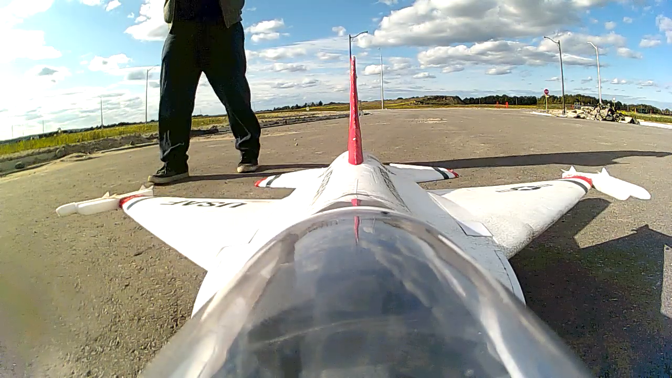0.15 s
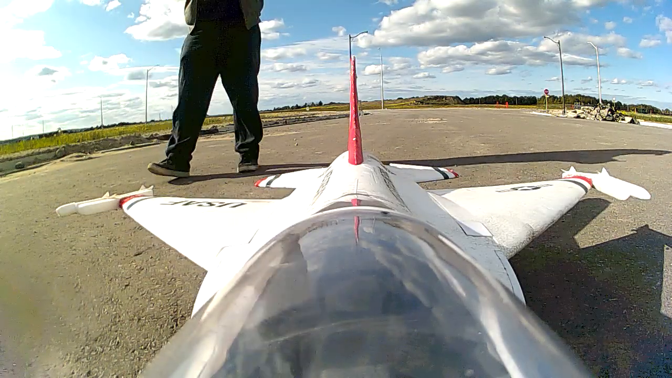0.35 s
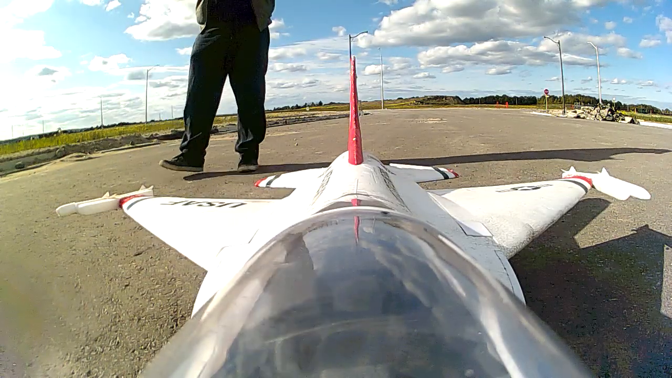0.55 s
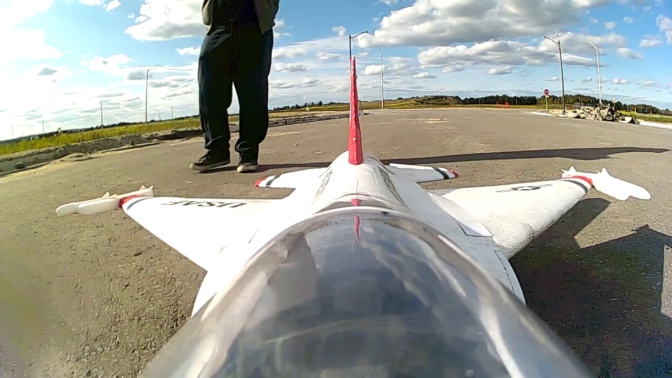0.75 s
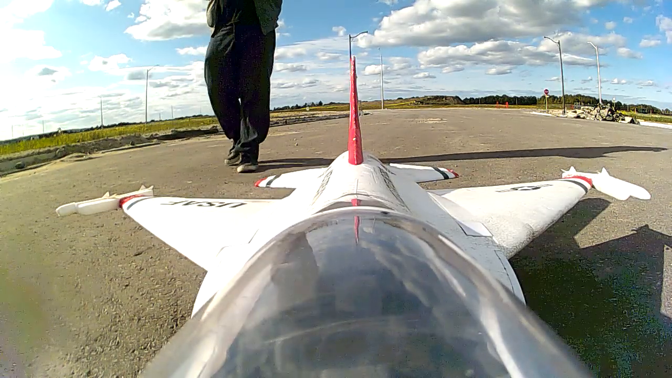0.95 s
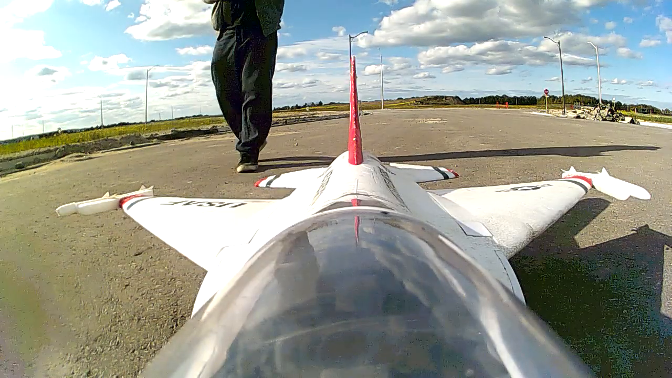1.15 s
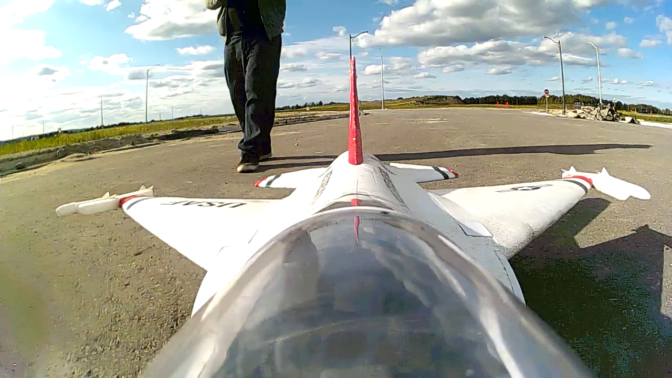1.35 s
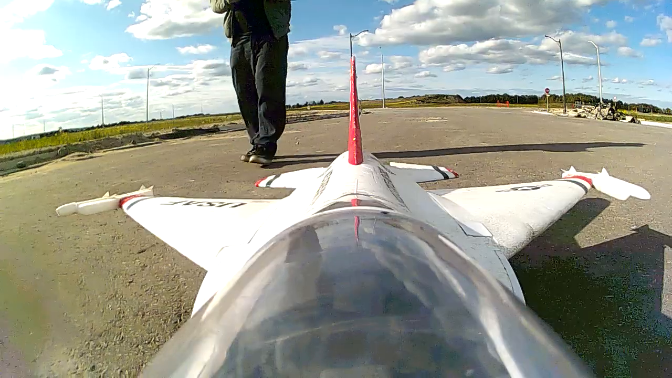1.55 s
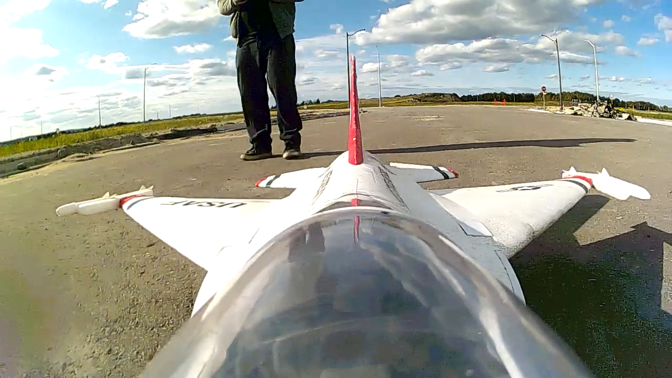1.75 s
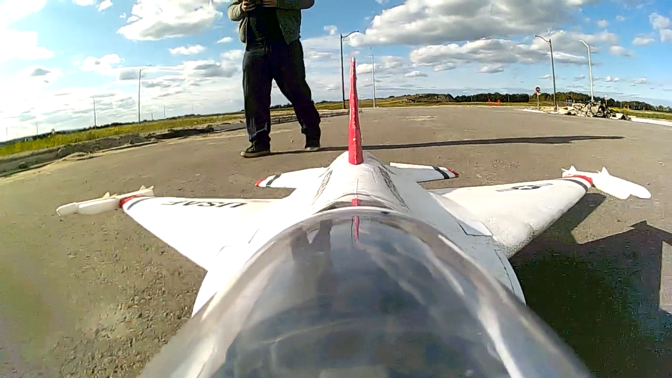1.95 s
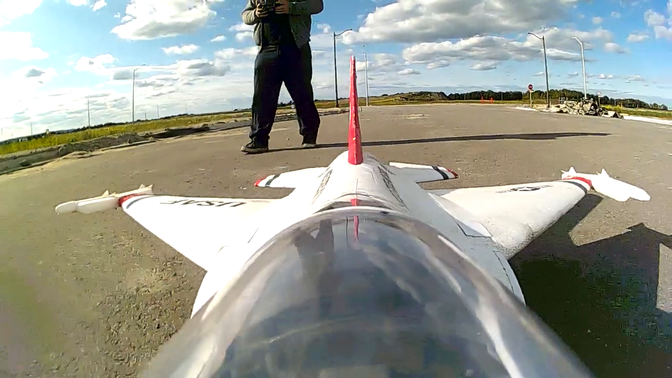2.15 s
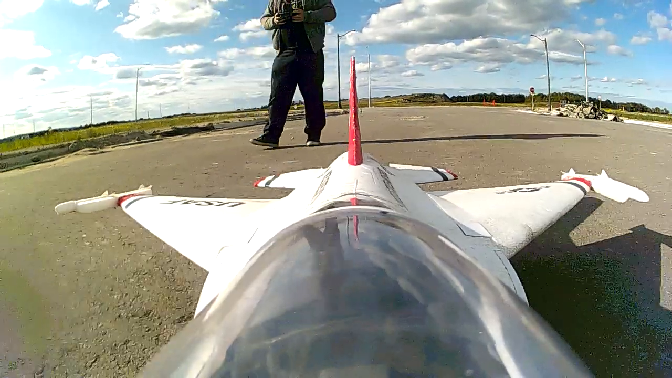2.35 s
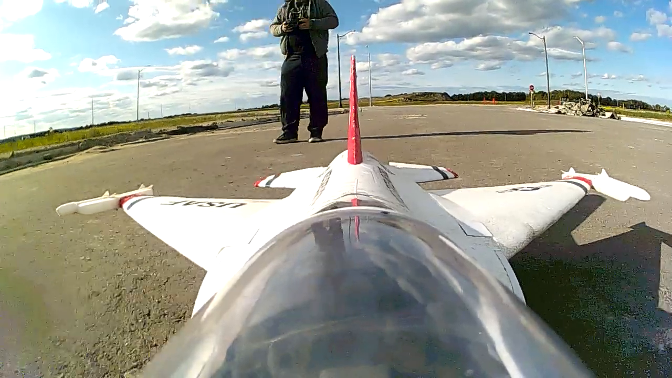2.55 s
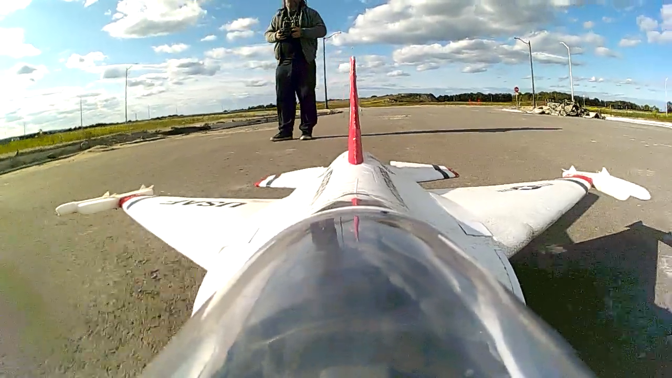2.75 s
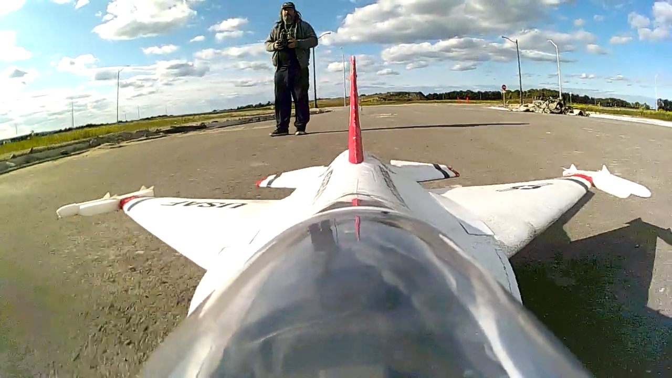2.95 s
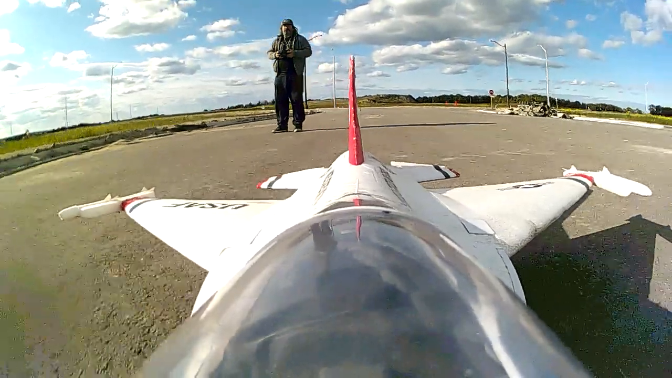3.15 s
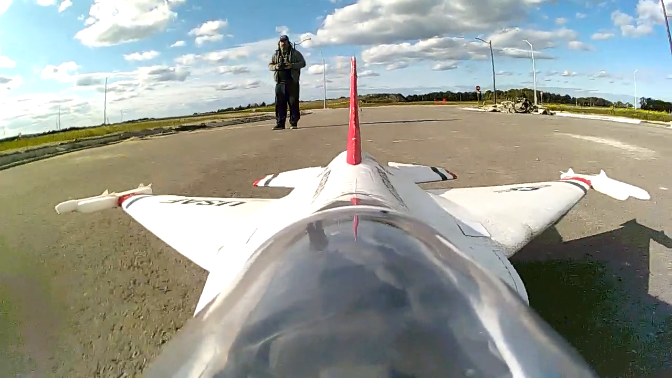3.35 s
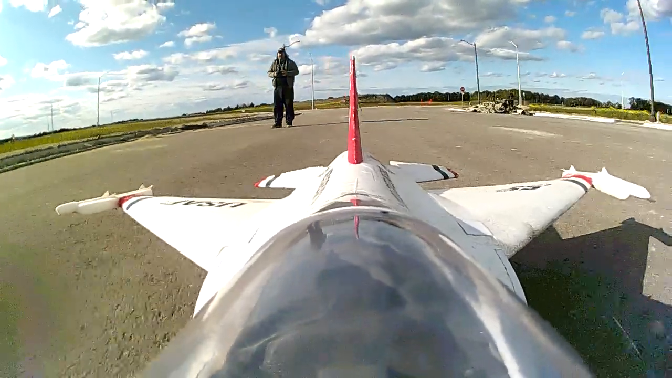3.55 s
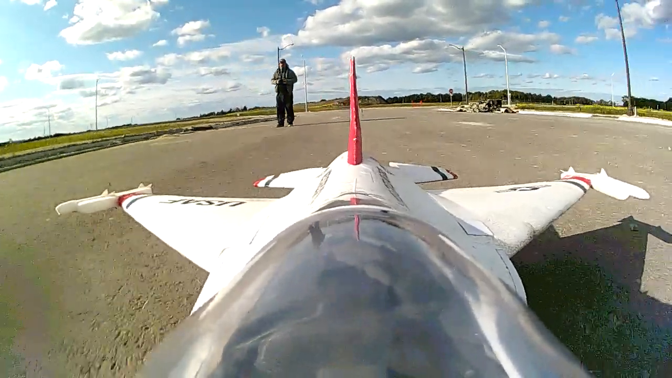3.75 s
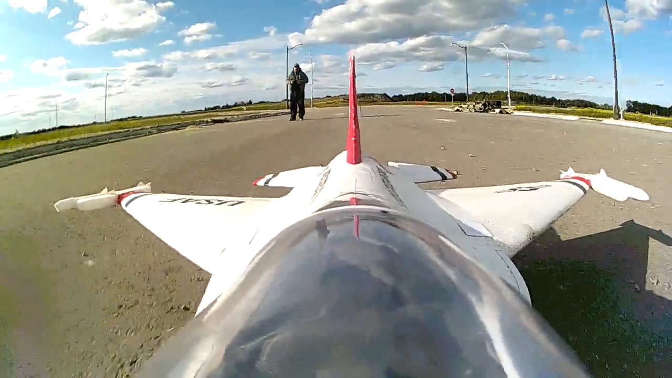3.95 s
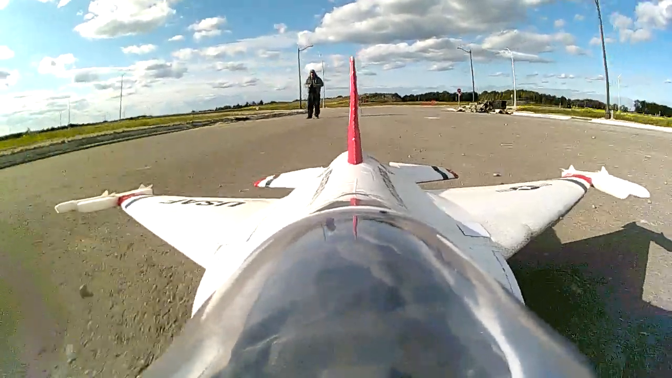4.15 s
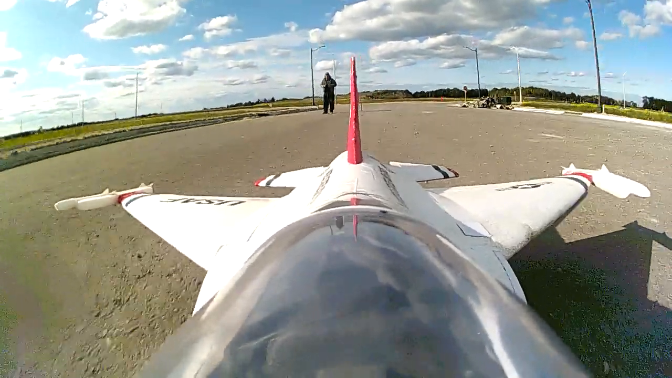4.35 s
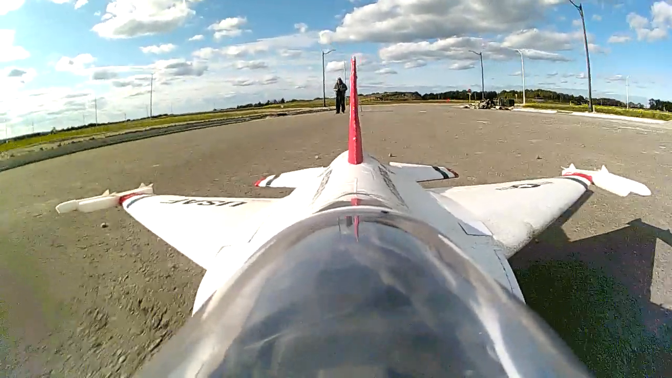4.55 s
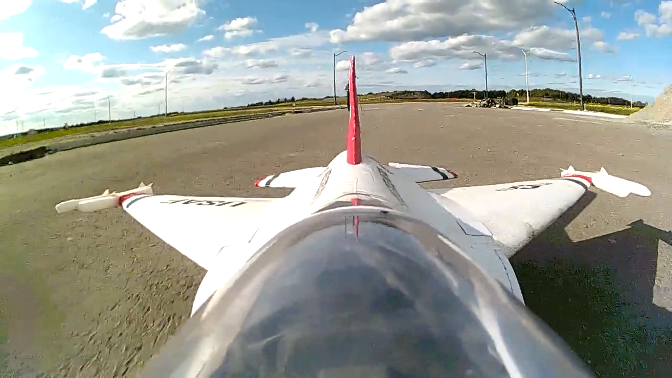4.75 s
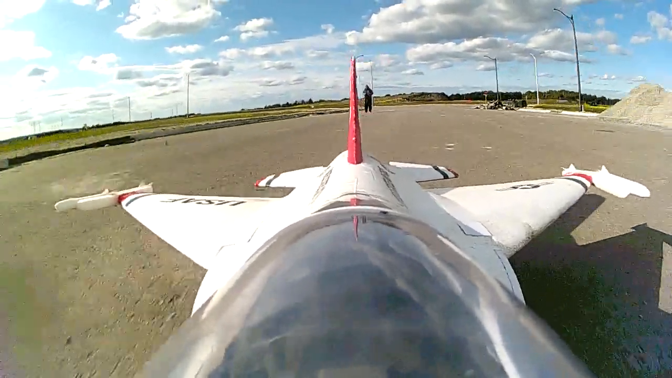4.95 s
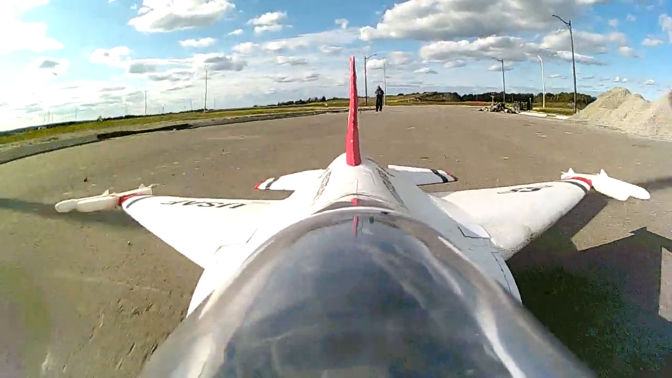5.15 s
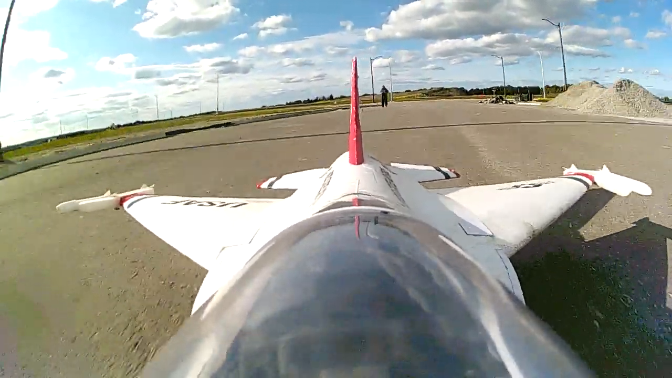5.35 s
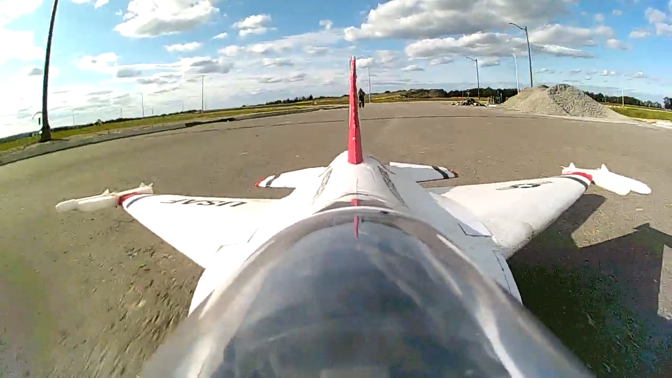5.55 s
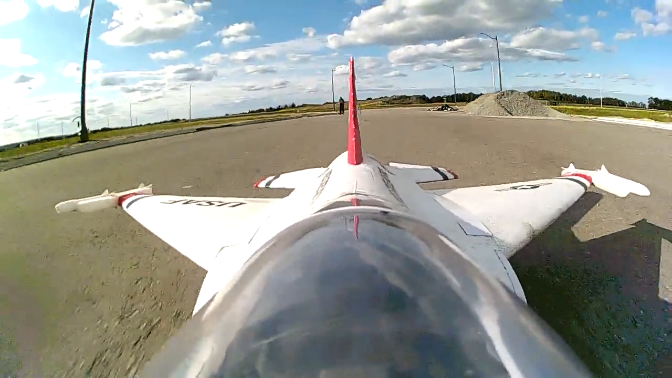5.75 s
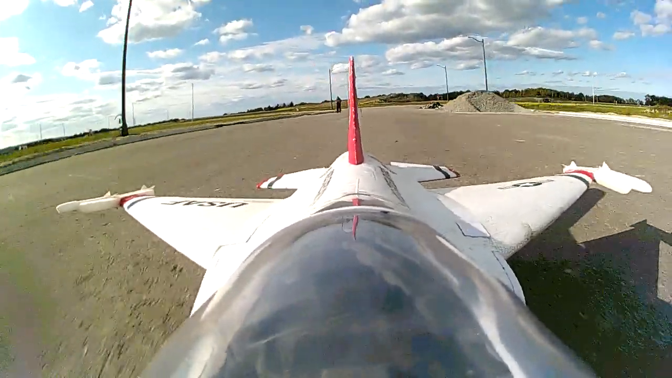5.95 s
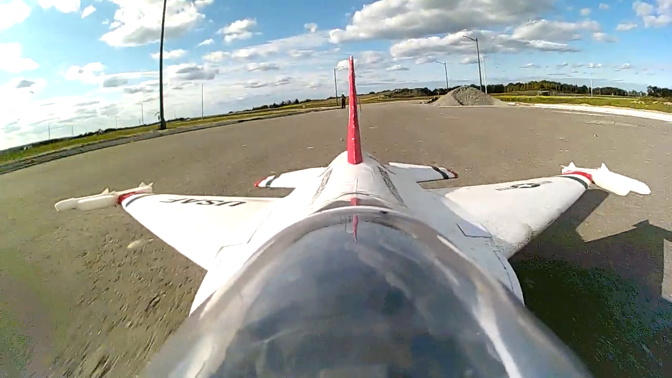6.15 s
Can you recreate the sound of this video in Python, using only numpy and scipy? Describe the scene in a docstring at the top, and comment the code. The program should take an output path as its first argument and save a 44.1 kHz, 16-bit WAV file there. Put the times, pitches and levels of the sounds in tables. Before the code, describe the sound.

A model jet's electric fan twitches, chirps and catches, then surges to a loud steady hum with roaring air, wheel rumble and growing wind.

```python
"""Quiet open air with scuffs, then twitches, rising chirps, a hum with roaring air, and wheels and wind.
A model jet with an electric ducted fan starts up, idles and accelerates along an asphalt runway.
The microphone rides on its nose, so motor, wheels and wind are close and the airframe carries them.
Shaft rate drives the hum and the noise of air in the duct; the thrust adds up to ground speed, which
drives wheel noise and wind. The narrow-band microphone overloads on the loudest peaks."""
import sys
import numpy as np
from scipy import signal
from scipy.fft import rfft, irfft
from scipy.io import wavfile
from scipy.ndimage import uniform_filter1d

SR = 44100
rng = np.random.default_rng(int(sys.argv[2]) if len(sys.argv) > 2 else 0)


def dump(signal):
    """Clip the signal to [-1, 1] and save it as 16-bit WAV at the path in sys.argv[1]."""
    limited = np.clip(np.atleast_2d(signal).T, -1, 1)
    pcm = np.round(limited * 32767).astype(np.int16)
    wavfile.write(sys.argv[1], SR, pcm)


N = 272979
T = np.arange(N) / SR  # seconds


def undb(db):
    """Decibels to gain."""
    return 10 ** (np.asarray(db) / 20)


def unit(x):
    """Scale to rms 1."""
    return x / np.sqrt(np.mean(x ** 2))


def ramp(start, length):
    """Rise from 0 to 1 over a stretch of time in seconds."""
    return np.clip((T - start) / length, 0, 1)


def gate(start, length, edge_s=0.02):
    """Attack, hold and release, with edges centred on the start and end."""
    return ramp(start - edge_s / 2, edge_s) - ramp(start + length - edge_s / 2, edge_s)


def bell(centre, spread):
    """Gaussian swell in time, 1 at its peak."""
    return np.exp(-0.5 * ((T - centre) / spread) ** 2)


def walk(rate_hz):
    """Smooth random drift with spread 1."""
    step = int(SR / rate_hz)
    held = np.repeat(rng.standard_normal(N // step + 1), step)
    smooth = uniform_filter1d(uniform_filter1d(held, step), step)
    return unit(smooth[:N])


def noise(spectrum):
    """Noise of rms 1, coloured by a table of frequency and level."""
    hz, db = np.transpose(spectrum)
    bins_hz = np.maximum(np.arange(N // 2 + 1) * SR / N, 1)
    colour_db = np.interp(np.log(bins_hz), np.log(hz), db)
    return unit(irfft(rfft(rng.standard_normal(N)) * undb(colour_db), N))


def resonate(x, hz, width):
    """One resonance, gain 1 at its centre."""
    return signal.lfilter(*signal.iirpeak(hz, hz / width, fs=SR), x)


def rub_noise(first, second):
    """Noise of rms 1 through two resonances in a row, each given as (Hz, width Hz)."""
    return unit(resonate(resonate(rng.standard_normal(N), *first), *second))


def boost(hz, resonances):
    """Decibels that a gliding tone gains as it crosses resonances."""
    return sum(db * np.exp(-((hz - centre) / width) ** 2) for centre, width, db in resonances)


# Open-air background around the runway: freq_hz, level_db (relative)
OPEN_AIR = [(25, 3), (60, 1.5), (110, 3.5), (150, -4), (230, -7.5), (400, -8), (600, -12.5), (800, -6),
            (1100, -7.5), (1600, -13), (2450, -19.5), (3450, -22.5), (4000, -29.5)]
# Soft scuffs and thuds before the start: peak_s, level_db, centre_hz, width_hz, spread_s
SHOE_SCUFFS = [(.02, -66, 1290, 900, 0.084), (0.013, -70, 2330, 400, 0.036), (0.043, -60, 670, 200, 0.013),
               (0.105, -62, 2180, 250, 0.012), (0.12, -52.5, 1940, 800, 0.0029),
               (0.161, -59, 350, 250, 0.0036), (0.997, -53, 90, 50, 0.011)]


def airfield(air_db=-65.5, drift_db=0.91):
    """Quiet open air as coloured noise, with a few shoe scuffs and soft thuds as swells of band noise."""
    out = noise(OPEN_AIR) * undb(air_db + drift_db * walk(4.2))
    for peak_s, db, hz, width, spread in SHOE_SCUFFS:
        rub = rub_noise((hz, width), (hz, width))
        out = out + undb(db) * rub * bell(peak_s, spread)
    return out


# Resonances of the motor mount: centre_hz, width_hz, level_db
MOUNT_MODES = [(1820, 78, 0), (2470, 61, -1.5)]


def mount(x):
    """Vibration ringing through the modes of the motor mount."""
    return sum(undb(db) * resonate(x, hz, width) for hz, width, db in MOUNT_MODES)


# Jerks of the rotor before it runs smoothly: peak_s, level_db, spread_s
ROTOR_JERKS = [(1.056, -61, 0.0046), (1.074, -57, 0.003), (1.1, -41.5, 0.011), (1.163, -58, 0.013),
               (1.23, -57, 0.012), (1.358, -49.5, 0.021), (1.372, -36, 0.0037), (1.394, -29.5, 0.0044)]


def jerks(overtone_db=-14, rub_db=-17, wobble=0.0131):
    """Each jerk of the rotor sets the mount modes ringing softly, with a little rubbing noise."""
    swell = sum(undb(db) * bell(peak_s, spread) for peak_s, db, spread in ROTOR_JERKS)
    ring = 0
    for i, (hz, _, db) in enumerate(MOUNT_MODES):
        wavering_hz = hz * (1 + wobble * walk(200))
        angle = 2 * np.pi * np.cumsum(wavering_hz) / SR
        ring = ring + undb(db + i * overtone_db) * np.sin(angle)
    rub = rub_noise((1300, 1100), (1000, 1100))
    return swell * (np.sqrt(2) * ring + undb(rub_db) * rub)


# Resonance that the chirps excite: centre_hz, width_hz, boost_db
CHIRP_RESONANCE = [(418, 45, 5.5)]
# The motor pulling into step: start_s, length_s, first_hz, last_hz, level_db, pitch scatter (share)
STEP_CHIRPS = [(1.058, 0.08, 398, 433, -54.5, 0.065), (1.163, 0.192, 303, 590, -48.5, 0.022)]


def chirp(rasp_db=-32, stutter_db=5.0):
    """The drive current sings unevenly in rising glides as it drags the rotor up; the mount buzzes along."""
    out = 0
    buzz = unit(mount(rng.standard_normal(N)))
    for start, length, first_hz, last_hz, db, scatter in STEP_CHIRPS:
        glide_hz = first_hz + (last_hz - first_hz) * np.sin(np.pi / 2 * ramp(start, length))
        uneven_hz = glide_hz * (1 + scatter * walk(168.5))
        tone = np.sqrt(2) * np.sin(2 * np.pi * np.cumsum(uneven_hz) / SR)
        level_db = db + boost(glide_hz, CHIRP_RESONANCE) + stutter_db * walk(100)
        out = out + gate(start, length) * undb(level_db) * (tone + undb(rasp_db) * buzz)
    return out


# The rotor catches, then settles towards its lowest running shaft rate
START_S, START_LAG_S, START_HZ = 1.369, 0.041, 289.1
SAG_HZ, SAG_S = 25.83, 2.4  # loss of shaft rate as the battery tires, and its time constant
# Throttle pushes, to taxi, a nudge, then full power: start_s, length_s, shaft_rise_hz
THROTTLE_PUSHES = [(1.586, 0.13, 73), (2.54, 0.1, 18), (2.653, .215, 229.5)]


def shaft_rate():
    """The rotor catches, follows each throttle push, then slows a little as the battery sags (Hz)."""
    caught = START_HZ * (1 - np.exp(-np.maximum(T - START_S, 0) / START_LAG_S))
    pushes = sum(rise * ramp(start, length) for start, length, rise in THROTTLE_PUSHES)
    last_start, last_length, _ = THROTTLE_PUSHES[-1]
    full_power_s = np.maximum(T - last_start - last_length, 0)
    sag = SAG_HZ * (1 - np.exp(-full_power_s / SAG_S))
    return np.maximum(caught + uniform_filter1d(pushes, size=1500) - sag, 1)


# Air through the duct, with its pipe resonances: freq_hz, level_db (relative)
DUCT_COLOUR = [(40, -15), (210, -6.5), (490, 1.5), (760, -3), (890, -12.5), (1000, -15.5), (1090, 2.5),
               (1300, 1), (1620, -5.5), (1880, 3.5), (2190, -4.5), (2330, 0), (2620, -0.5), (3100, -13.5),
               (3520, -25), (3950, -16)]


def duct_air(shaft_hz, air_db=-17.0, db_per_decade=44, surge_db=1.1, flutter_db=1.02,
             swish_s=0.012, build_s=0.043):
    """Turbulence rises steeply with fan speed and surges under acceleration; a swish leads the full flow."""
    speed_db = db_per_decade * np.log10(np.maximum(shaft_hz, 200) / shaft_hz.max())
    acceleration = uniform_filter1d(np.gradient(shaft_hz) * SR, size=2500)  # Hz per second
    load = np.clip(acceleration / 1000, 0, 1) * np.interp(shaft_hz, [300, 420], [0, 1])
    flow = noise(DUCT_COLOUR)
    swish_band = signal.butter(3, [1100, 2700], "bandpass", fs=SR, output="sos")
    swish = signal.sosfiltfilt(swish_band, flow)
    rest = flow - swish
    air = swish * ramp(START_S - swish_s, swish_s) + rest * ramp(START_S, build_s) ** 2
    return air * undb(air_db + speed_db + surge_db * load + flutter_db * walk(20))


# Magnetic whine: multiple of shaft rate, level_db
WHINE_PARTIALS = [(6, 2.5), (12, 5)]
# The motor whining under load: start_s, length_s, level_db
LOAD_PULLS = [(1.41, 0.062, -49), (1.523, .13, -48.5)]


def whine(angle, flare_db=13, flicker_db=2):
    """Magnetic pull repeats many times a turn and flares as it sweeps through the mount modes."""
    load = sum(undb(db) * gate(start, length) for start, length, db in LOAD_PULLS)
    partials = sum(undb(db) * np.sin(multiple * angle) for multiple, db in WHINE_PARTIALS)
    pull = np.sqrt(2) * partials * load * undb(flicker_db * walk(90))
    return pull + undb(flare_db) * mount(pull)


def bearings(shaft_hz, hiss_db=-44, centre_hz=3500, width_hz=1300):
    """The bearings hiss evenly, as band noise, once the rotor runs."""
    hiss = rub_noise((centre_hz, width_hz), (centre_hz, width_hz))
    return hiss * undb(hiss_db) * np.interp(shaft_hz, [170, 360], [0, 1])


THRUST_M_S2 = 3.84  # acceleration along the runway at top shaft rate


def ground_speed(shaft_hz):
    """Thrust goes with the square of shaft rate and adds up to speed in m/s."""
    return THRUST_M_S2 * np.cumsum((shaft_hz / shaft_hz.max()) ** 2) / SR


HUM_DB, HUM_DB_PER_DECADE = -12.5, 60  # base level at top shaft rate, and growth with that rate
HUM_FADE_DB, HUM_DRIFT_DB = -2, -0.6  # loss of level and spread of its drift at top ground speed
# Airframe resonances that the hum sweeps through: centre_hz, width_hz, boost_db
AIRFRAME_SHAKES = [(321, 23, 7), (487, 18, 3.5)]


def hum_level(shaft_hz, speed):
    """Hum in dB grows with shaft rate and at resonances; it weakens slightly with speed, drifting a little."""
    growth_db = HUM_DB_PER_DECADE * np.log10(shaft_hz / shaft_hz.max())
    spin_db = HUM_DB + growth_db + boost(shaft_hz, AIRFRAME_SHAKES)
    return spin_db + (speed / speed.max()) ** 2 * (HUM_FADE_DB + HUM_DRIFT_DB * walk(14))


# Rotor hum before the foam damps it: multiple of shaft rate, level_db
HUM_PARTIALS = [(1, -1.5), (2, -18), (3, -20.5)]


def rotor(angle, hum_db, waver_db=0.53, body_hz=810):
    """Slight imbalance shakes the airframe once a turn; the foam damps the overtones."""
    partials = sum(undb(db) * np.sin(multiple * angle) for multiple, db in HUM_PARTIALS)
    hum = signal.sosfilt(signal.butter(4, body_hz, fs=SR, output="sos"), partials)
    return np.sqrt(2) * hum * undb(hum_db + waver_db * walk(25))


# Level approached at high speed, speed at half that gain, steepness
WHEEL_DB, WHEEL_KNEE_M_S, WHEEL_POWER = -14, 4.03, 2.27  # wheel rumble
TYRE_DB, TYRE_KNEE_M_S, TYRE_POWER = -17, 9.64, 5  # tyre hiss
WIND_DB, WIND_DB_PER_DECADE = -24, 20.5  # wind at top ground speed, and its growth with speed
# Wheels heard through the foam airframe: freq_hz, level_db (relative)
WHEEL_COLOUR = [(60, -10.5), (190, -3.5), (300, 2), (500, 4), (700, 3.5), (860, -2.5), (1150, 0),
                (1500, -5.5), (2000, -3), (2700, -7), (3150, -19), (4000, -25)]
# Tyre hiss: freq_hz, level_db (relative)
TYRE_COLOUR = [(300, -25), (1200, -1.5), (1900, 2), (2250, -7), (2700, 3), (3150, -1), (3550, -3),
               (4000, -17)]
# Wind at the microphone: freq_hz, level_db (relative)
WIND_COLOUR = [(15, -7.5), (35, -3.5), (70, 3), (120, 1.5), (250, -11), (800, -34)]
# Brief surges of wheel noise, with one hard jolt: start_s, peak_db, decay_s
WHEEL_SURGES = [(2.921, -11.5, 0.0054), (3.249, -13.5, 0.0072), (3.336, -13.5, 0.01), (3.704, -11, 0.0056),
                (3.952, -13.5, 0.0049), (4.186, -10, 0.005), (4.356, 1.5, 0.0047), (4.36, -3.5, 0.0018),
                (5.355, -22, 0.017)]


def ground_run(speed, rattle_db=0.09, gust_db=1.6):
    """Wheels grind on coarse asphalt, surge briefly and hiss at speed while wind buffets the microphone."""
    rumble = undb(WHEEL_DB) / (1 + (WHEEL_KNEE_M_S / speed) ** WHEEL_POWER)
    sizzle = undb(TYRE_DB) / (1 + (TYRE_KNEE_M_S / speed) ** TYRE_POWER)
    wind_db = WIND_DB + WIND_DB_PER_DECADE * np.log10(speed / speed.max())
    rattle = undb(rattle_db * walk(70))
    surges = 0
    for start, db, decay in WHEEL_SURGES:
        surges = surges + (T >= start) * undb(db) * np.exp(-np.abs(T - start) / decay)
    wheels = (rattle * rumble + surges) * noise(WHEEL_COLOUR)
    hiss = (rattle * sizzle + surges / 2) * noise(TYRE_COLOUR)
    wind = undb(wind_db + gust_db * walk(13)) * noise(WIND_COLOUR)
    return wheels + hiss + wind


def scene():
    """Shaft rate drives whine, hum and rushing air together, and its thrust sets the jet rolling."""
    shaft_hz = shaft_rate()
    speed = ground_speed(shaft_hz)
    angle = 2 * np.pi * np.cumsum(shaft_hz) / SR
    motor = jerks() + chirp() + whine(angle) + bearings(shaft_hz)
    humming = np.interp(shaft_hz, [178, 226], [0, 1])  # shaft rates over which the airframe starts to hum
    fan = duct_air(shaft_hz) + humming * rotor(angle, hum_level(shaft_hz, speed))
    return (airfield() + motor + fan + ground_run(speed))[None]


def record(dry, headroom=0.94, drive_db=1.0, mic_hz=4080, clip_level=0.7, top_hz=15900):
    """A speech-band microphone rounds the peaks; the loudest then clip flat and crackle above its range."""
    rounded = headroom * np.tanh(undb(drive_db) * dry / headroom)
    narrow = signal.sosfilt(signal.cheby1(14, 0.2, mic_hz, fs=SR, output="sos"), rounded)
    clipped = np.clip(narrow, -clip_level, clip_level)
    return signal.sosfiltfilt(signal.ellip(8, 0.1, 50, top_hz, fs=SR, output="sos"), clipped)


dry = scene()
out = record(dry)
dump(out)
```